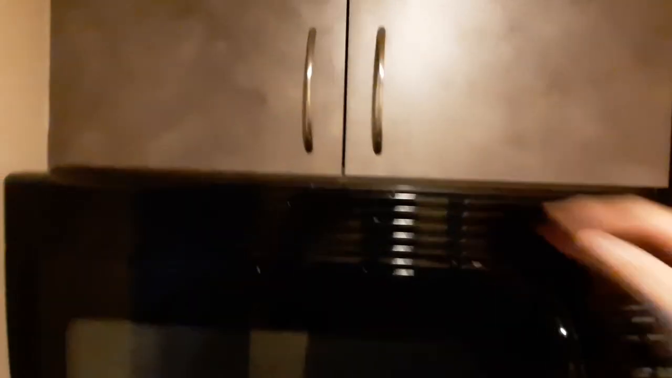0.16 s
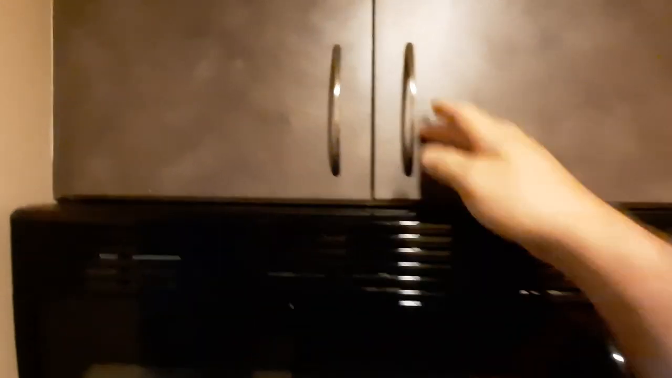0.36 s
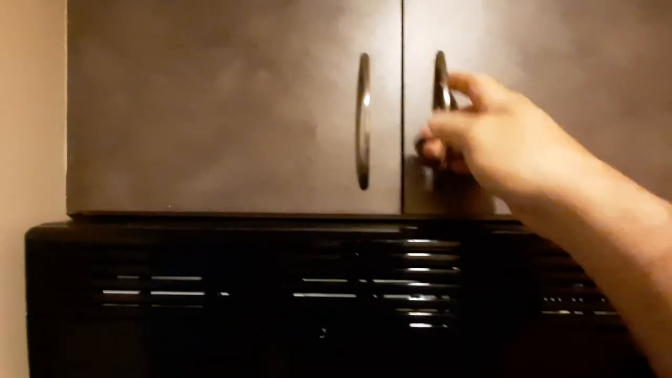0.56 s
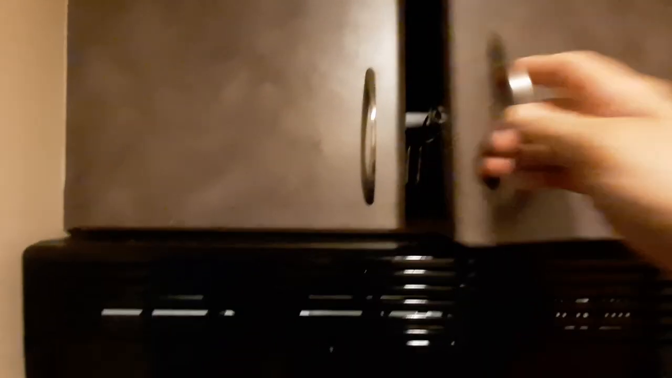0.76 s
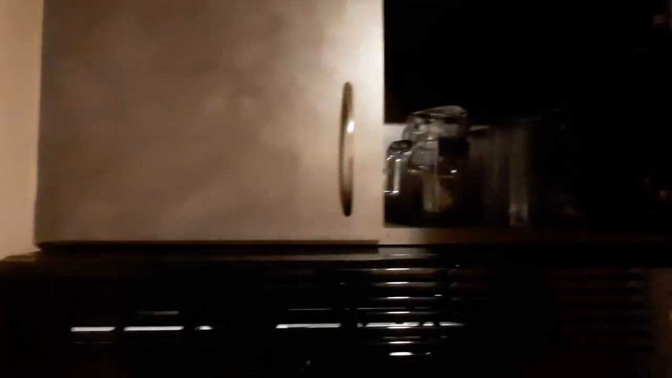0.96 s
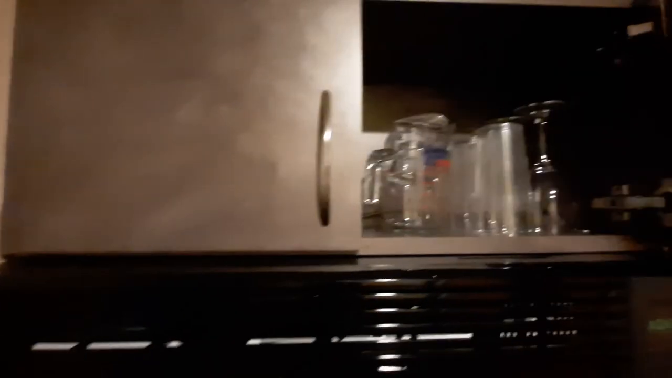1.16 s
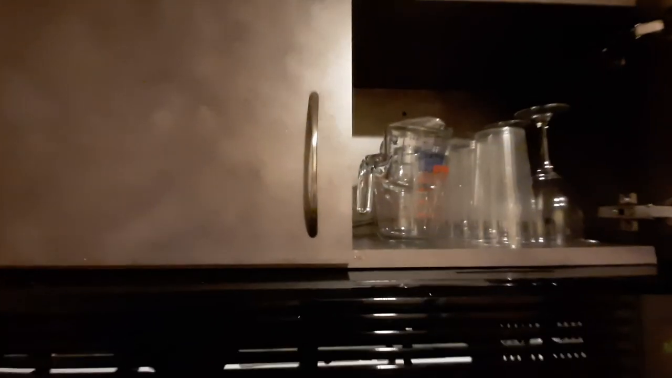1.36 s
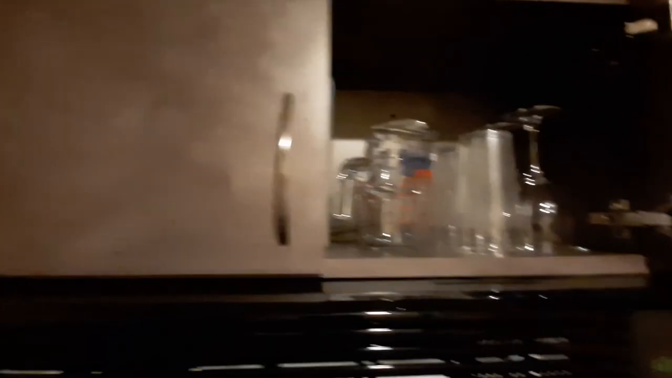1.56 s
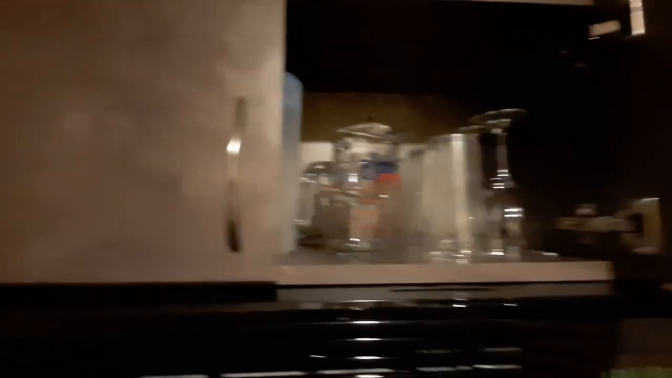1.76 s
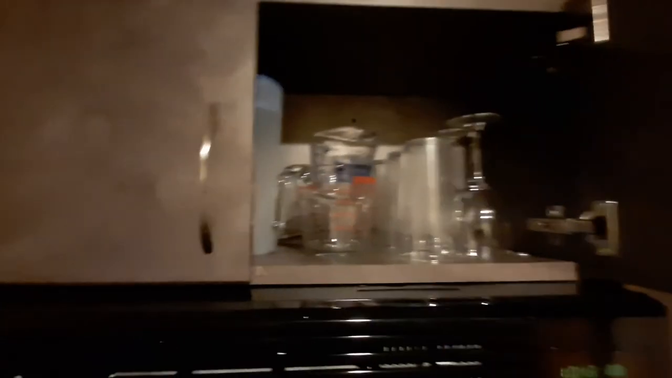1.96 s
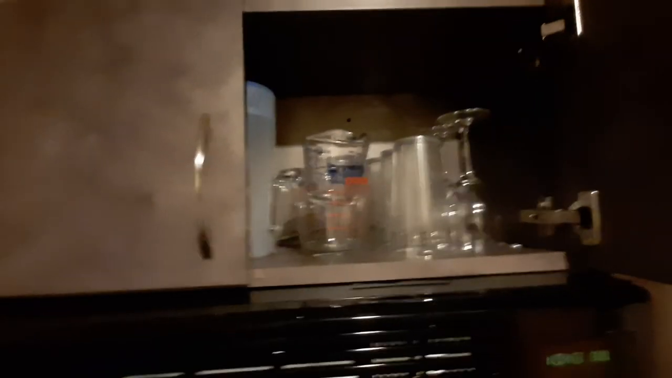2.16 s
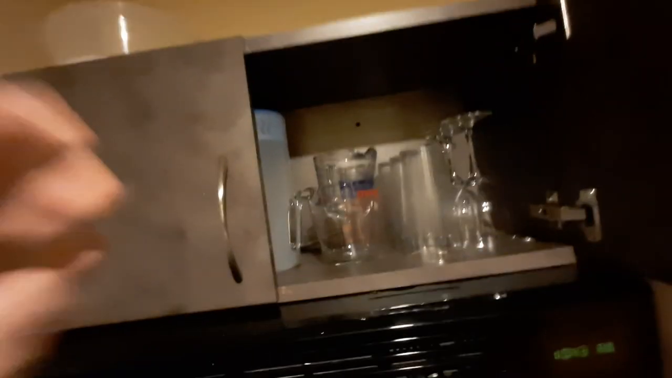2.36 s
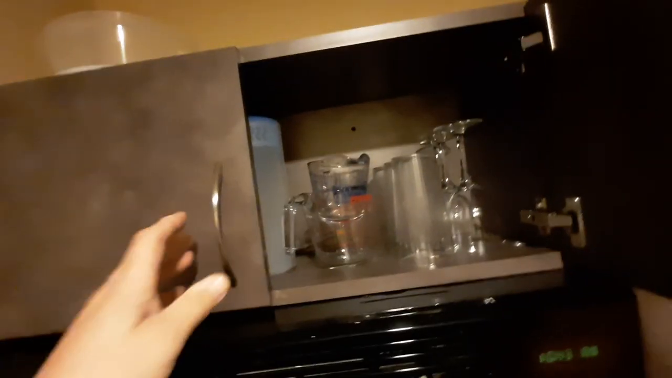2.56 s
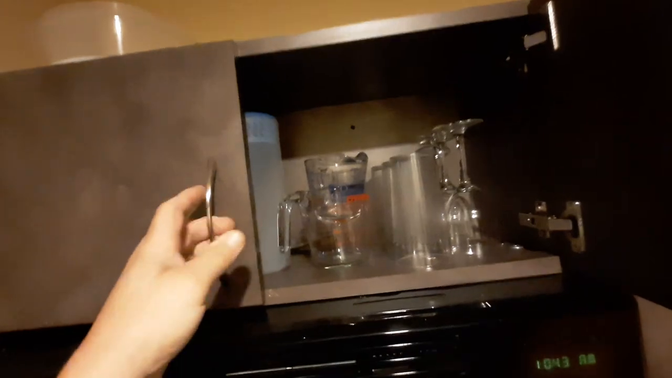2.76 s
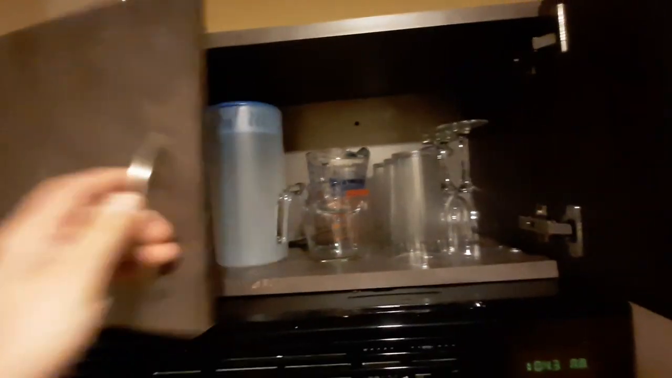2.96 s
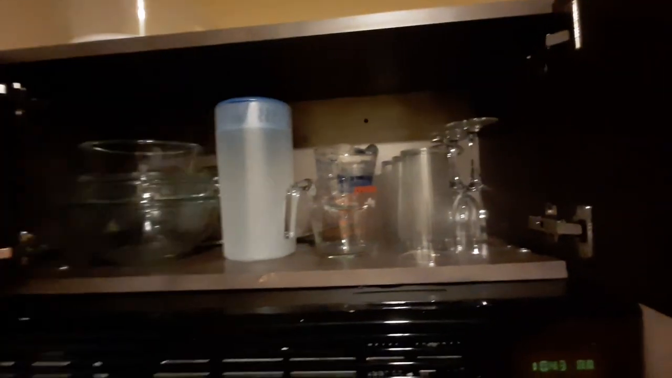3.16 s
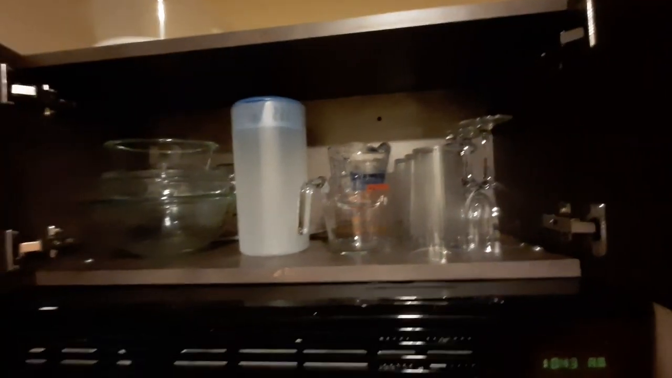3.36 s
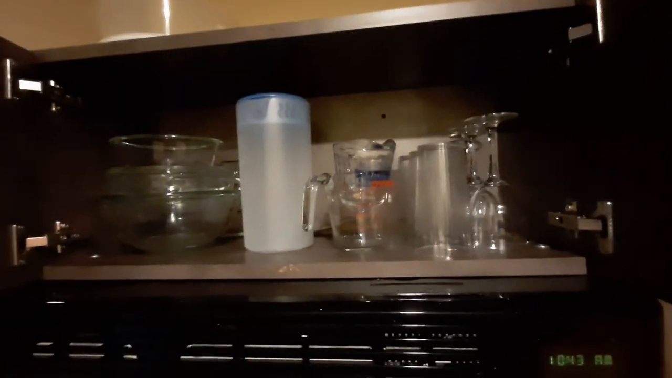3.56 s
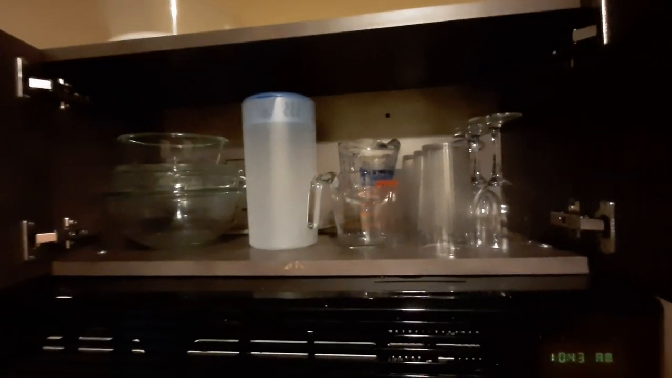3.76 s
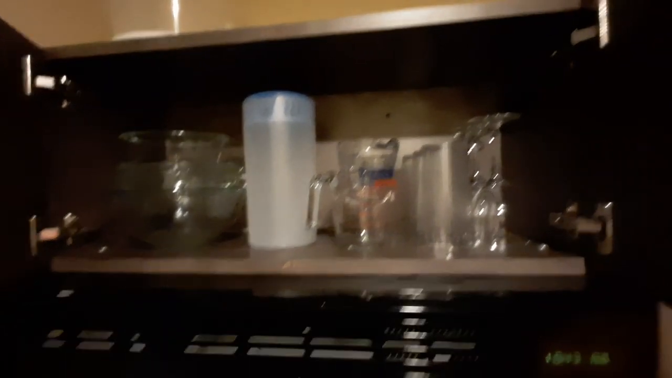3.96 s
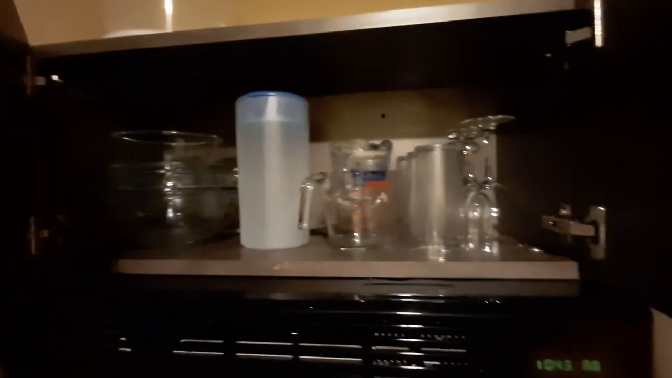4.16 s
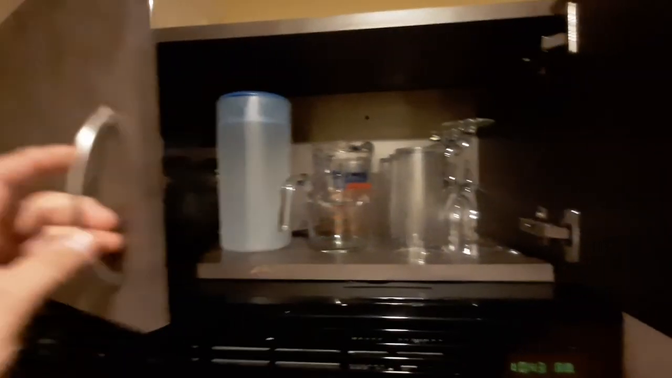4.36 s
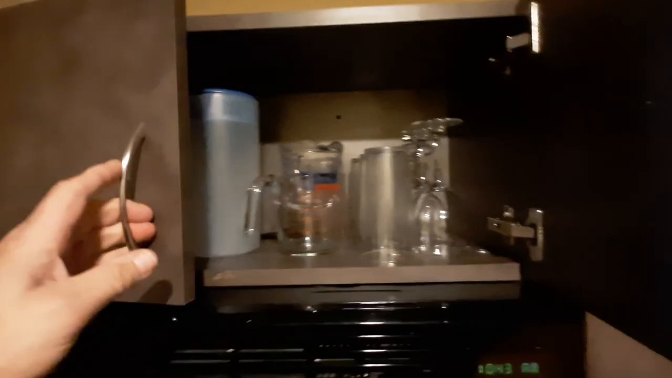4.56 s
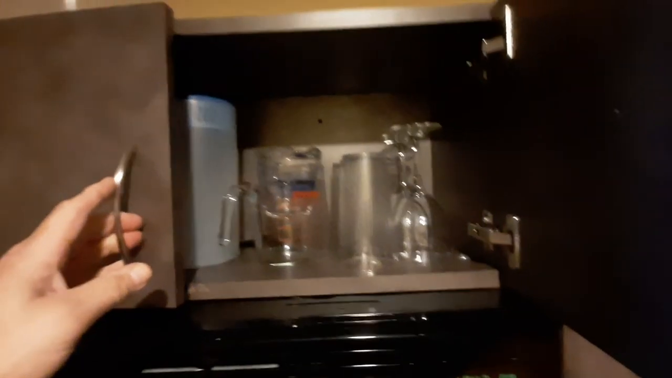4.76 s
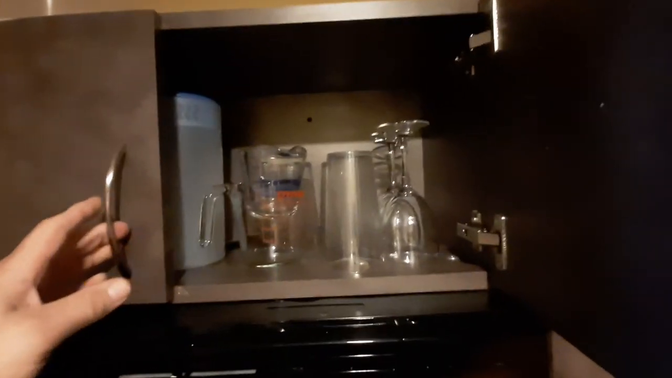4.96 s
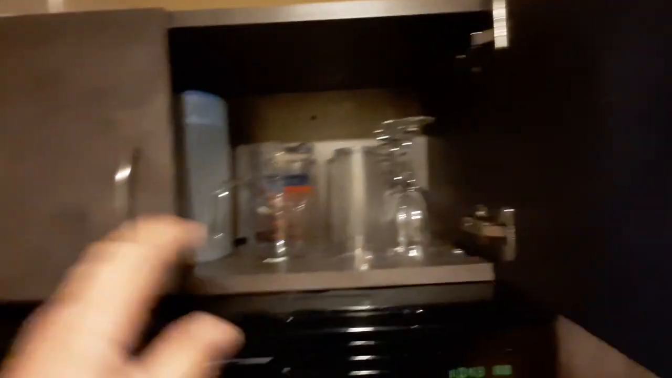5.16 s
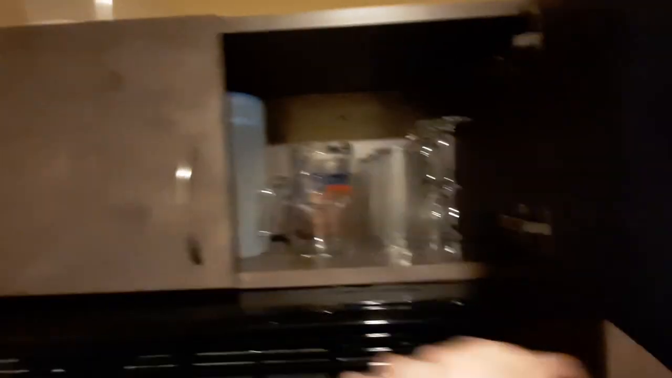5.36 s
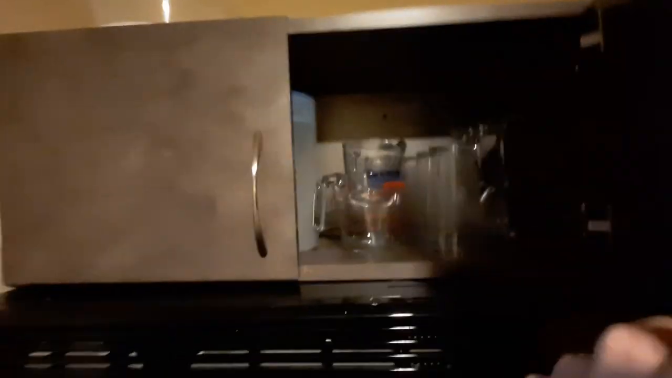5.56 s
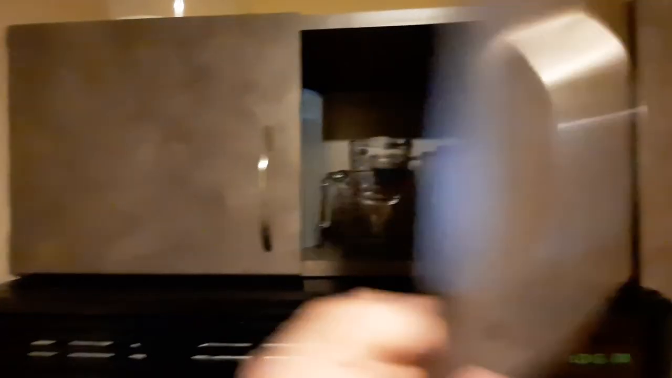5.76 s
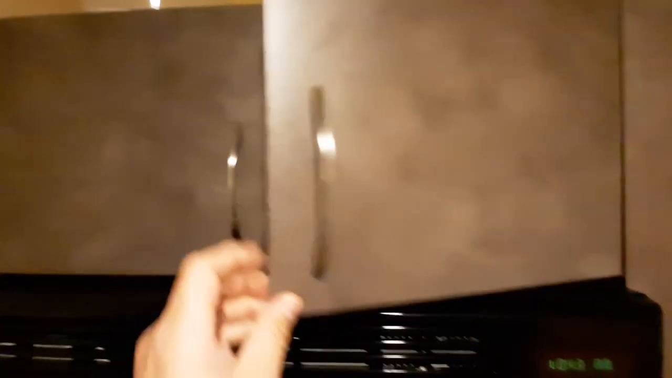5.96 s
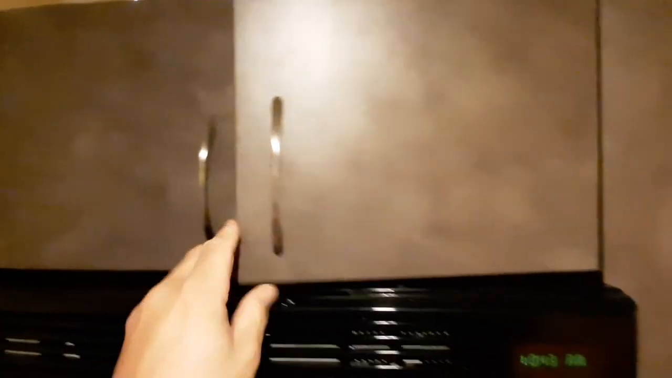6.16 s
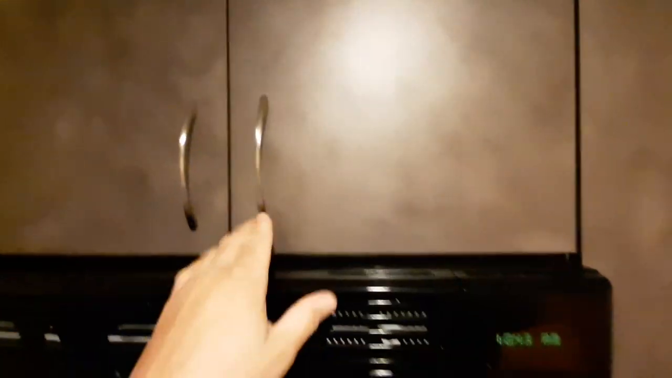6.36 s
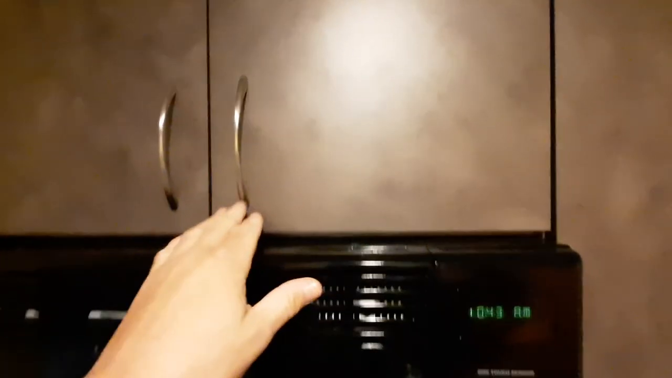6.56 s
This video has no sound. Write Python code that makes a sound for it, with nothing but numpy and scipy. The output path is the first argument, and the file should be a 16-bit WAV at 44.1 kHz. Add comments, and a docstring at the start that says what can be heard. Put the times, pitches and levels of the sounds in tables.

```python
"""Soft low bumps and the rub of a hand come first; then, in a small kitchenette, a sprung hinge snaps.
Two wooden cabinet doors are pulled open, right then left, and slam shut on the carcass, left then right.
Each blow is filtered clicks and noise bursts, dying sine modes of cabinet or panel, and a noise tail for the room.
Close to the two microphones, the hand that holds the camera clicks and rubs, as coloured, shaped noise.
Behind it all lie creaks of narrow noise, faint steady room tone and a low stir that swells with each movement."""
import sys
import numpy as np
from scipy import signal
from scipy.fft import rfft, irfft
from scipy.io import wavfile
from scipy.ndimage import uniform_filter1d

SR = 44100
rng = np.random.default_rng(int(sys.argv[2]) if len(sys.argv) > 2 else 0)


def transcribe(u):
    """Save the signal u as a 16-bit wav file named by the first command-line argument.

    u: samples, shape (n,) or (channels, n), limited to [-1, 1]; the rate is SR.
    q: integer samples, one column per channel.
    """
    v = np.clip(np.atleast_2d(u).T, -1, 1)
    q = np.round(v * 32767).astype(np.int16)
    wavfile.write(sys.argv[1], SR, q)


N = 291581

# In every table, left-right balance is left minus right: a negative value lies to the right.
# Modes of each door on its carcass. Each row: frequency in Hz, relative level in dB, T60 in s.
LEFT_DOOR_MODES = [(66, 0, .28), (108, -3, .24), (127, -3, .28), (192, -16, .5), (372, -16, .36),
                   (392, -15, .4), (463, -19, .34), (506, -20, .5), (588, -21, .28), (666, -20, .32),
                   (799, -26, .28), (905, -20, .16), (983, -17, .29), (1342, -20, .24), (1482, -27, .28),
                   (1545, -28, .28), (1727, -28, .25), (2188, -34, .27)]
RIGHT_DOOR_MODES = [(67, -9, .4), (88, -3, .26), (108, -2, .26), (193, -2, .35), (377, -11, .2),
                    (506, -16, .38), (626, -12, .26), (810, -17, .3), (883, -19, .4), (1001, -11, .32),
                    (1115, -3, .25), (1345, -15, .35), (1430, -12, .3), (1474, -14, .3), (1538, -9, .32),
                    (1646, -14, .38), (2078, -16, .31), (2552, -19, .27), (2625, -16, .36),
                    (2665, -20, .33)]
# Bright modes of cabinet and room, shared by both opening snaps.
# Each row: frequency in Hz, relative level in dB, T60 in s.
CABINET_MODES = [(1344, -5, .22), (1416, -4, .2), (1494, -5, .27), (1540, -2, .24), (1940, -3, .26),
                 (2088, -2, .22), (2200, 2, .14), (2290, -3, .2), (2440, 0, .22), (2628, -1, .22),
                 (2785, -1, .2), (2998, -2, .22), (3056, -2, .17), (3254, -3, .26), (4270, -9, .2),
                 (4550, -8, .2), (4819, -6, .2), (5085, -8, .22), (5480, -8, .2), (6550, -5, .13)]
# Colour of the dense, unresolved modes of each blow. Each row: frequency in Hz, level in dB.
RIGHT_SNAP_COLOUR = [(59, -43.5), (100, -12), (150, -1.5), (335, -15.5), (365, -19.5), (595, -9),
                     (691, -15.5), (872, -14.5), (1230, -18.5), (2370, -13.5), (6560, -19.5), (8830, -21.5),
                     (11900, -23), (16000, -31)]
LEFT_SNAP_COLOUR = [(59, -24.5), (100, -1), (156, -15), (202, -8), (343, -13.5), (481, -10.5), (930, -18.5),
                    (991, -10), (2130, -8.5), (3250, -11), (4980, -11), (8460, -17), (10900, -18),
                    (16000, -32.5)]
LEFT_SLAM_COLOUR = [(50, -17.5), (105, -8), (195, -13.5), (245, -17.5), (310, -14.5), (385, -12.5),
                    (770, -20), (1150, -24), (1500, -25), (2200, -32), (3100, -37), (4000, -53),
                    (6500, -57.5), (8600, -65), (12300, -54), (16000, -67)]
RIGHT_SLAM_COLOUR = [(47, -35), (85, -2), (156, -10.5), (194, -4), (240, -14.5), (320, -12), (480, -11.5),
                     (937, -14.5), (1280, -17), (1530, -11), (1800, -15), (2600, -19.5), (4000, -26.5),
                     (6500, -31.5), (8600, -43.5), (12000, -44.5), (16000, -64)]
# Hinges snapping open, right then left. Each row: start in s, crack level in dB, clatter level in dB,
# clatter decay in s, settling in s, room level in dB, cabinet ring level in dB, panel level in dB,
# left-right balance in dB.
OPENING_SNAPS = [(0.582, -38, -22.5, 0.0041, .0005, -28, -31, -36, -3),
                 (2.7948, -30, -25.5, 0.0063, .0005, -28.5, -32.5, -36.5, -4.5)]
# Doors slamming, left then right. Each row: start in s, crack level in dB, clatter level in dB,
# clatter decay in s, settling in s, room level in dB, chatter in s, panel level in dB, panel rise in s,
# left-right balance in dB.
CLOSING_SLAMS = [(4.8766, -47, -19, 0.0079, 0.0032, -23, 0.0089, -10.5, 0.0073, -2.5),
                 (6.2576, -27.5, -17, 0.005, 0.0034, -18.5, 0.053, -12, 0.018, -2.5)]
# Light touches on handles and doors. Each row: start in s, level in dB, decay in s,
# room level relative to the scuff in dB, tilt in dB per octave, left-right balance in dB.
LIGHT_TOUCHES = [(0.214, -48, .006, 1, -2, -4), (0.334, -49.5, 0.026, -6, -0.5, -1),
                 (0.564, -42.5, 0.0054, 4.5, 1, -4), (2.602, -49.5, 0.031, 3, -4, -7.5),
                 (2.765, -41.5, 0.0067, -7, 0, -4), (2.993, -45, 0.0071, -1, -5, -7),
                 (4.446, -55, 0.029, -10, -4, -5), (5.692, -70.5, .006, 6, 2.5, -14.5),
                 (6.168, -51, 0.035, 0.5, -2.5, -5)]
# Creaks and ticks of hinge and panel. Each row: start in s, level in dB, length in s,
# frequency in Hz, bandwidth in Hz.
DOOR_CREAKS = [(0.219, -48, 0.037, 616, 403), (0.344, -55.5, 0.053, 2660, 1400),
               (0.352, -60, 0.085, 1630, 300), (2.765, -37, 0.023, 941, 516),
               (2.979, -49.5, 0.035, 462, 153), (3.04, -63, 0.084, 528, 350),
               (4.462, -58.5, 0.017, 244, 91), (5.484, -58, 0.025, 417, 291),
               (5.688, -61.5, 0.015, 1622, 500), (6.16, -54, 0.049, 503, 117),
               (6.171, -62, 0.05, 2390, 114), (6.224, -57, 0.03, 2380, 110)]
# Soft low bumps. Each row: start in s, level in dB, frequency in Hz, rise in s, T60 in s.
LOW_BUMPS = [(0.0, -23, 63.1, 0.00087, 0.51), (0.069, -5.5, 68.4, 0.029, 0.12),
             (0.173, -10.5, 71.6, 0.03, 0.13), (0.259, -25.5, 65.6, 0.013, 0.48),
             (0.326, -31, 198, 0.0023, 0.13), (0.565, -27, 62.8, 0.005, 0.54),
             (1.765, -41.5, 130.4, 0.00078, 0.046), (2.168, -48.5, 149.8, 0.0026, .2),
             (2.608, -29, 74, 0.013, 0.25), (2.613, -37, 128, 0.0024, 0.17),
             (2.767, -34.5, 123, 0.0032, 0.12), (2.793, -20, 62, 0.0019, 0.17),
             (2.794, -25, 125, 0.0006, 0.092), (3.005, -33, 121.5, 0.009, 0.21),
             (3.056, -34.5, 67.9, 0.015, 0.31), (4.466, -41, 64.5, 0.072, 0.37),
             (5.1, -26, 68.6, 0.011, 0.14)]
# Dry clicks and rubs on the camera body. Each row: start in s, click level in dB, rub level in dB,
# rub length in s, ring frequency in Hz, tilt in dB per octave, left-right balance in dB.
CAMERA_CLICKS = [(1.7672, -52.5, -42.5, 0.025, 1480, 0, -6), (1.851, -67, -59.5, 0.01, 3180, 0.5, -12),
                 (1.863, -67, -51, 0.022, 3100, 1, -9), (1.96, -70, -58.5, 0.0076, 696, -5.5, 3),
                 (1.9853, -65.5, -50.5, 0.017, 2700, 0, -4), (2.002, -66, -48.5, 0.062, 3060, -1.5, 5),
                 (2.1198, -52, -56.5, 0.011, 875, -2, 11), (2.1286, -64, -37, 0.016, 2060, 4.5, 17),
                 (2.1378, -31.5, -38.5, 0.029, 940, 0, 13), (2.1492, -39, -46.5, 0.05, 3490, 9, 31),
                 (2.1689, -61, -36, 0.024, 1340, 1, 7.5), (4.593, -59.5, -62.5, .01, 1331, -7.5, -1.5),
                 (4.982, -47, -54, .004, 2790, -6, -12), (5.095, -60, -56, 0.0072, 990, -7, -4),
                 (5.121, -74, -68, 0.0025, 5000, -6.5, 6), (5.3644, -55, -54, 0.0047, 2700, -1.5, -13),
                 (5.421, -67.5, -62, 0.048, 990, -7, 1), (5.7, -72.5, -71.5, 0.011, 1134, -1.5, -15)]
# Colour of the camera case. Each row: frequency in Hz, level in dB.
CAMERA_CASE_COLOUR = [(60, -47), (130, -12.5), (250, -14), (350, 1), (650, -4), (1000, -5.5), (1500, -4.5),
                      (2200, -6.5), (4800, -13.5), (7400, -17), (8500, -29), (11600, -22), (16000, -31)]
# Strokes of hand and sleeve. Each row: fastest moment in s, level in dB, rise in s, tilt in dB per octave.
HAND_STROKES = [(.13, -66, 0.21, 6.5), (.38, -61, 0.04, 2), (1.053, -62, 0.025, 6), (1.23, -71, .025, 2.5),
                (2.02, -67.5, 0.12, 1), (2.63, -57.5, 0.015, 4.5), (2.709, -51, 0.026, -0.5),
                (3.035, -60, 0.008, 5), (4.3, -84, 0.043, 6), (4.83, -73.5, 0.031, 0),
                (5.048, -58, .025, -1), (5.41, -60, 0.03, -1), (5.475, -59, 0.0093, -4),
                (5.513, -54, .012, 0.5), (5.61, -63, 0.022, 3.5), (5.764, -58, 0.027, 3.5),
                (6.09, -69.5, .02, 1.5), (6.22, -54.5, 0.016, 0), (6.52, -55, 0.036, -4.5)]
# Colour of rubbing skin and cloth. Each row: frequency in Hz, level in dB.
SKIN_AND_CLOTH_COLOUR = [(88, -33), (150, -9.5), (186, -10), (376, -3), (475, -21), (1500, -3.5),
                         (4080, -19), (6260, -18), (8560, -25.5), (11300, -16.5), (16000, -25)]
# Arm and door movements that stir the room's low modes. Each row: fastest moment in s, level in dB, rise in s.
ARM_AND_DOOR_SWINGS = [(0.352, -46.5, 0.16), (2.25, -62.5, 0.12), (3.04, -47, 0.049), (4.521, -51.5, 0.049),
                       (5.148, -51.5, 0.1), (6.27, -51, 0.17)]
# Colour of the low stir, and of the steady room tone. Each row: frequency in Hz, level in dB.
LOW_STIR_COLOUR = [(25, -12), (48, -10.5), (62, 7.5), (85, -9.5), (130, -16.5), (200, -14.5), (270, -25.5),
                   (370, -16), (500, -25), (1000, -27.5), (2500, -50.5)]
ROOM_TONE_COLOUR = [(15, -57), (25, -21.5), (41, -10), (64, -0.5), (149, -34), (190, -19.5), (229, -34),
                    (326, -21), (394, -27.5), (489, -27.5), (962, -46.5), (1400, -18), (1700, -47.5),
                    (9320, -53.5), (16000, -40)]
# Reverberation of the kitchenette. Each row: frequency in Hz, T60 in s.
ROOM_DECAY = [(60, 0.49), (160, 0.46), (420, 0.29), (1100, 0.4), (2900, .36), (7700, 0.24), (15000, 0.31)]
# Likeness of the two microphones. Each row: frequency in Hz, left-right likeness from 0 to 1.
MICROPHONE_LIKENESS = [(60, 0.78), (200, 0.82), (500, 0.49), (1200, 0.067), (15000, 0.051)]
# Dip in the microphone response. Each row: frequency in Hz, level in dB.
MICROPHONE_DIP = [(7400, -1), (8600, -6), (9600, -4.0), (10800, 1.0)]

ROOM_TONE_DB = -66.5
STILL_DB = -74  # low murmur of the room between movements
GRIP_DB = -82  # the resting hand is never quite still
STROKE_FALL_RATIO, SWING_FALL_RATIO = 1.6, 1.4  # fall time as a multiple of the rise time
BAND_LIMIT_HZ = 16200
T = np.arange(SR) / SR  # one second of time, in s
HZ = np.fft.rfftfreq(4096, 1 / SR)  # frequency grid of the colour filters


def amp(db):
    """Decibels to gain."""
    return 10 ** (np.asarray(db) / 20)


def read(points, hz):
    """Reads a curve joined by straight lines on a log frequency axis."""
    f, value = np.transpose(points)
    return np.interp(np.log(hz + 1), np.log(f + 1), value)


def evened(x):
    """Scales to rms 1."""
    return x / np.sqrt(np.mean(x ** 2) + 1e-20)


def burst(x):
    """Scales a short sound to the energy of a twentieth of a second at rms 1."""
    energy = np.mean(np.sum(x ** 2, -1))
    return x / np.sqrt(energy * 20 / SR + 1e-20)


def add(mix, start, sound, pan_db):
    """Places a sound in time and between left and right."""
    part = mix[:, max(round(start * SR), 0):][:, :sound.shape[-1]]
    balance = evened(amp([[pan_db / 2], [-pan_db / 2]]))
    part += (balance * sound)[:, :part.shape[1]]


def coloured(x, colour, tilt_db=0):
    """Minimum-phase filter with the given spectrum, tilted in dB per octave about roughly 1 kHz."""
    level_db = read(colour, HZ) + tilt_db * np.log2(HZ / 1000 + .1)
    log_gain = np.log(amp(np.maximum(level_db, -100)))
    mirrored = np.r_[log_gain, log_gain[-2:0:-1]]
    # the Hilbert transform of the log gain gives the causal phase
    response = np.exp(np.conj(signal.hilbert(mirrored)))[:len(HZ)]
    return signal.fftconvolve(x, irfft(response)[None], axes=1)[:, :x.shape[1]]


def resonant(colour, modes, lift_db=7, share=0.024):
    """Raises or lowers a spectrum around each mode, so that the noise too favours or shuns those pitches."""
    hz = np.transpose(modes)[0][:, None]
    peaks = np.exp(-((HZ - hz) / (share * hz + 8)) ** 2).max(0)
    return np.c_[HZ, read(colour, HZ) + lift_db * peaks]


def diffuse(size):
    """Noise at two microphones: alike in the bass, nearly unrelated in the treble."""
    a, b = rfft(rng.standard_normal((2, size)))
    same = np.clip(read(MICROPHONE_LIKENESS, np.fft.rfftfreq(size, 1 / SR)), 0, 1)
    return irfft(np.array([a, same * a + np.sqrt(1 - same ** 2) * b]), size)


def grainy(spread_db):
    """Friction noise: tiny slips of uneven size, each 20 samples long."""
    slips = np.repeat(rng.standard_normal(SR // 20 + 1), 20)[:SR]
    return diffuse(SR) * amp(spread_db * slips)


def room(chatter=0, build=0.013):
    """Dense reflections, held up while the door chatters, then dying band by band."""
    hz, t, bands = signal.stft(diffuse(SR), SR, nperseg=256)
    bands = bands * amp(-60 * np.maximum(t - chatter, 0) / read(ROOM_DECAY, hz)[:, None])
    tail = signal.istft(bands, SR, nperseg=256)[1][:, :SR]
    return tail * (1 - np.exp(-T / build))


def ring(modes, rise):
    """Dying modes; the higher ones reach the two microphones out of step."""
    hz, db, t60 = np.transpose(modes)[:, :, None]
    phase = (2 * rng.random(hz.shape) - 1) * np.minimum(hz / 700, 1.5)
    fade = amp(db - 60 * T / t60) * (1 - np.exp(-T / rise))
    fade[::2] *= -1  # neighbouring modes swing in opposite directions
    return np.array([(fade * np.sin(2 * np.pi * hz * T + side * phase)).sum(0) for side in (1, -1)])


def crack(second=0):
    """The direct click of one contact, and of a second edge landing that many seconds later."""
    spike = np.zeros((2, SR))
    spike[:, [0, int(abs(second) * SR)]] = 1
    return spike


def swell(peak, rise, fall_ratio):
    """Speed of one movement: it grows, rounds off at its peak time and dies away."""
    t = np.arange(N) / SR - peak
    pace = np.where(t < 0, rise, rise * fall_ratio)
    return 1 / np.cosh(np.minimum(abs(t) / pace, 30))


def narrow(hz, width_hz):
    """Noise in one narrow resonance that follows the curve hz."""
    low_pass = signal.butter(2, width_hz / 2, fs=SR, output="sos")
    slow = signal.sosfilt(low_pass, diffuse(len(hz)) + 1j * diffuse(len(hz)))
    carrier = np.exp(2j * np.pi * np.cumsum(hz) / SR)
    return evened((slow * carrier).real)


def blow(colour, crack_db, clatter_db, decay, settle, room_db, chatter, bright_db=1.5):
    """A bright first contact, the clatter of panel and near surfaces as the door settles, then the room."""
    clatter = diffuse(SR) * np.exp(-T / decay) * (1 - np.exp(-T / settle))
    direct = amp(crack_db) * burst(coloured(crack(settle), colour, bright_db))
    near = amp(clatter_db) * burst(coloured(clatter, colour, bright_db / 2))
    far = amp(room_db) * burst(coloured(room(chatter), colour))
    return direct + near + far


def slams():
    """Panels slam on the carcass: a blow coloured by the door's modes, and the boom of those modes."""
    out = np.zeros((2, N))
    doors_in_turn = (LEFT_DOOR_MODES, RIGHT_DOOR_MODES)
    colours = (LEFT_SLAM_COLOUR, RIGHT_SLAM_COLOUR)
    for row, door, colour in zip(CLOSING_SLAMS, doors_in_turn, colours):
        start, crack_db, clatter_db, decay, settle, room_db, chatter, panel_db, rise, pan_db = row
        toned = resonant(colour, door, lift_db=6)
        slam = blow(toned, crack_db, clatter_db, decay, settle, room_db, chatter)
        add(out, start, slam + amp(panel_db) * ring(door, rise), pan_db)
    return out


def hinge_snaps():
    """Hinge springs snap over as the doors open: a blow, the cabinet ring and a ringing panel."""
    out = np.zeros((2, N))
    doors_in_turn = (RIGHT_DOOR_MODES, LEFT_DOOR_MODES)
    colours = (RIGHT_SNAP_COLOUR, LEFT_SNAP_COLOUR)
    for row, door, colour in zip(OPENING_SNAPS, doors_in_turn, colours):
        start, crack_db, clatter_db, decay, settle, room_db, cabinet_db, panel_db, pan_db = row
        toned = resonant(colour, CABINET_MODES, lift_db=2)
        snap = blow(toned, crack_db, clatter_db, decay, settle, room_db, chatter=0)
        cabinet_ring = amp(cabinet_db) * ring(CABINET_MODES, rise=.002)
        panel = amp(panel_db) * ring(door, rise=0.0015)
        add(out, start, snap + cabinet_ring + panel, pan_db)
    return out


def doors():
    """Both doors' snaps and slams, reaching the left microphone a little later than the right."""
    left, right = hinge_snaps() + slams()
    lag = 11  # samples: the left microphone is slightly farther off
    return np.array([np.r_[np.zeros(lag), left[:-lag]], right])


def touches():
    """Fingers brush a handle or a door leaves its frame: a short scuff and its echo."""
    out = np.zeros((2, N))
    colour = resonant(RIGHT_SNAP_COLOUR, CABINET_MODES, lift_db=-1.0)
    for start, db, decay, room_db, tilt_db, pan_db in LIGHT_TOUCHES:
        scuff = grainy(4) * (1 - np.exp(-3 * T / decay)) * np.exp(-T / decay)
        sound = burst(scuff) + amp(room_db) * burst(room(build=decay))
        add(out, start, amp(db) * burst(coloured(sound, colour, tilt_db)), pan_db)
    return out


def creaks():
    """Hinges and panels give briefly under the hand, each in one narrow resonance."""
    out = np.zeros((2, N))
    for start, db, length, hz, width_hz in DOOR_CREAKS:
        envelope = np.sqrt(T / length) * np.exp(-(T / length) ** 3)
        creak = envelope / envelope.max() * narrow(np.full(SR, hz), width_hz)
        add(out, start, amp(db) * creak, pan_db=-3)
    return out


def bumps():
    """Slow pushes wake only a low mode of cabinet or room: one dying sine each."""
    out = np.zeros((2, N))
    for start, db, hz, rise, t60 in LOW_BUMPS:
        envelope = amp(db - 60 * T / t60) * (1 - np.exp(-(T / rise) ** 2))
        add(out, start, envelope * np.sin(2 * np.pi * hz * T), pan_db=-2.5)
    return out


def clicks(grain_db=4, peak_db=7, room_db=-22):
    """The grip shifts on the camera: a click and a grainy rub ring the case, so close that little room is heard."""
    out = np.zeros((2, N))
    for start, click_db, rub_db, length, hz, tilt_db, pan_db in CAMERA_CLICKS:
        octaves_off = np.log2((HZ + 1) / hz)
        case_ring = peak_db * np.exp(-(octaves_off / .6) ** 2)
        colour = np.c_[HZ, read(CAMERA_CASE_COLOUR, HZ) + case_ring]
        rub = grainy(grain_db) * np.sqrt(T / length) * np.exp(-3 * (T / length) ** 2)
        echo_db = max(click_db, rub_db) + room_db
        parts = (click_db, crack()), (rub_db, rub), (echo_db, room())
        sound = sum(amp(db) * burst(coloured(x, colour, tilt_db)) for db, x in parts)
        add(out, start, sound, pan_db)
    return out


def rustle(fibre_db=2.0, pan_db=-3):
    """Skin and cloth rub as the hand moves, louder the faster it goes."""
    roughness = evened(uniform_filter1d(rng.standard_normal(N), size=60))
    rub = diffuse(N) * amp(fibre_db * roughness)
    out = amp(GRIP_DB) * evened(coloured(rub, SKIN_AND_CLOTH_COLOUR))
    for peak, db, rise, tilt_db in HAND_STROKES:
        speed = swell(peak, rise, STROKE_FALL_RATIO)
        stroke = speed * evened(coloured(rub, SKIN_AND_CLOTH_COLOUR, tilt_db))
        add(out, 0, amp(db) * stroke, pan_db)
    return out


def background():
    """Steady room tone, and a low stir that swells with each swing of arm and door."""
    tone = amp(ROOM_TONE_DB) * evened(coloured(diffuse(N), ROOM_TONE_COLOUR))
    motion = amp(STILL_DB)
    for peak, db, rise in ARM_AND_DOOR_SWINGS:
        motion = motion + amp(db) * swell(peak, rise, SWING_FALL_RATIO)
    stir = motion * evened(coloured(diffuse(N), LOW_STIR_COLOUR))
    return (tone + stir) * amp([[-1.4], [1.2]])  # left and right microphone, dB


def scene():
    """Everything heard in the kitchenette."""
    return doors() + touches() + creaks() + bumps() + clicks() + rustle() + background()


def record(dry):
    """The microphone has a dip near 9 kHz; a soft limiter then rounds off the highest peaks; then the band limit."""
    heard = coloured(dry, MICROPHONE_DIP)
    limited = heard / (1 + (heard / .92) ** 8) ** (1 / 8)  # peaks stay below .92 here
    low_pass = signal.firwin(511, BAND_LIMIT_HZ, window=("kaiser", 11), fs=SR)
    return signal.oaconvolve(limited, low_pass[None], "same")


dry = scene()
out = record(dry)
transcribe(out)
```